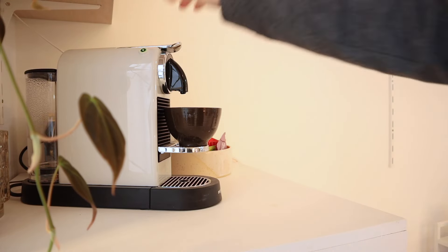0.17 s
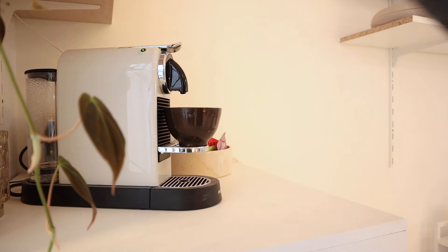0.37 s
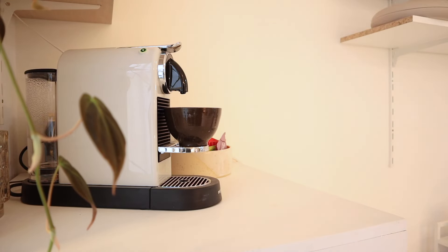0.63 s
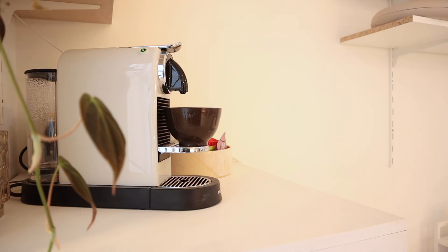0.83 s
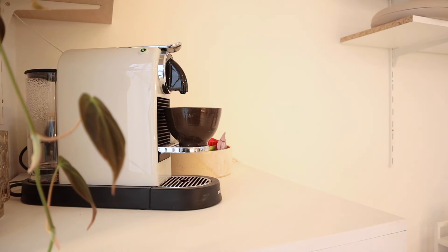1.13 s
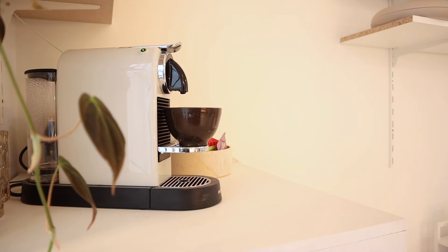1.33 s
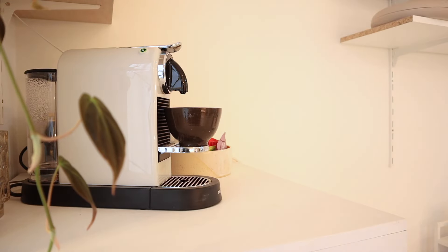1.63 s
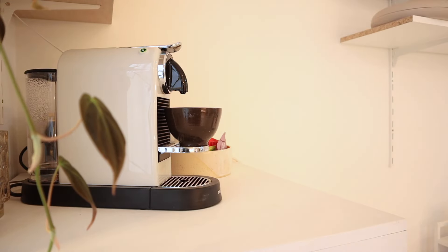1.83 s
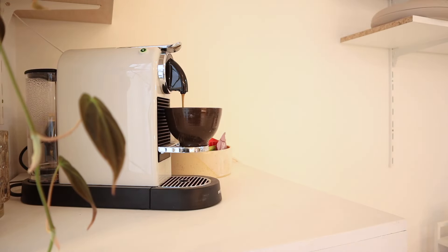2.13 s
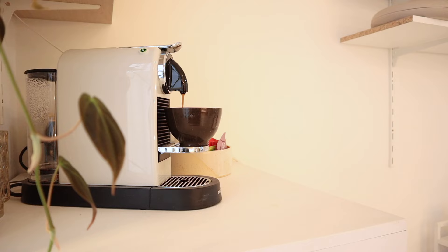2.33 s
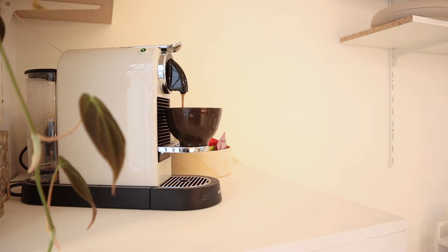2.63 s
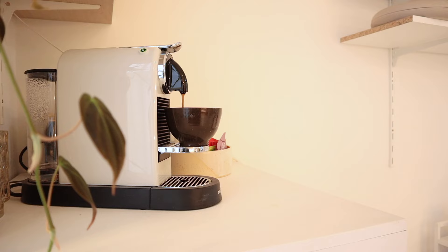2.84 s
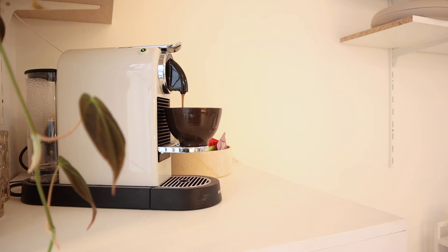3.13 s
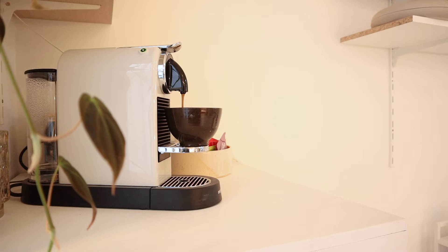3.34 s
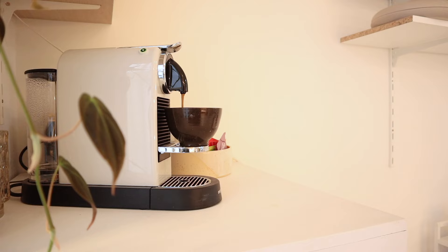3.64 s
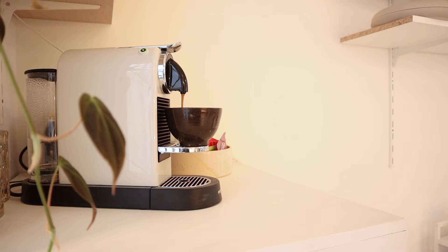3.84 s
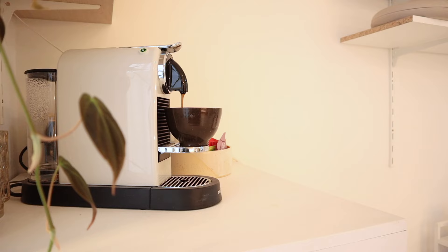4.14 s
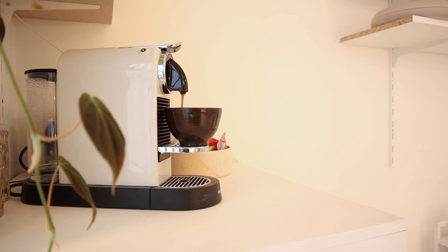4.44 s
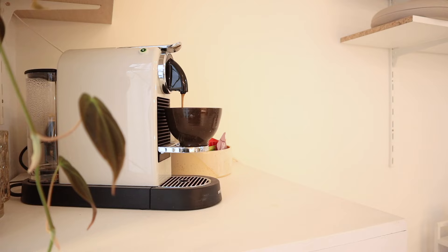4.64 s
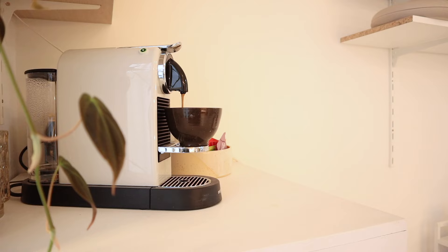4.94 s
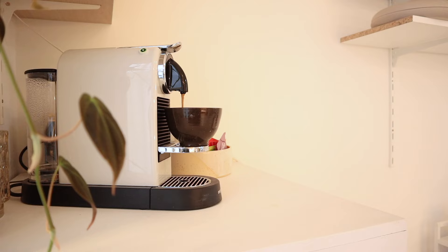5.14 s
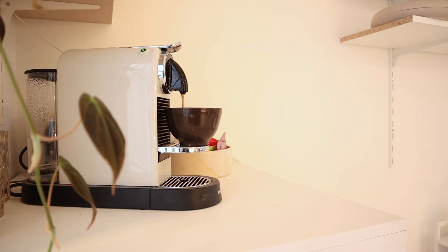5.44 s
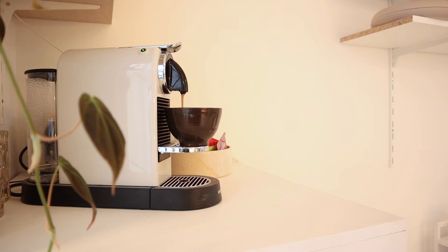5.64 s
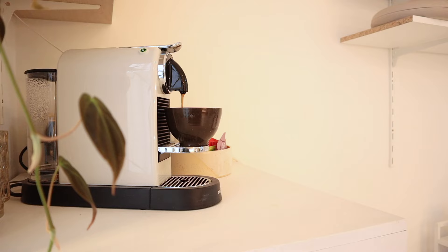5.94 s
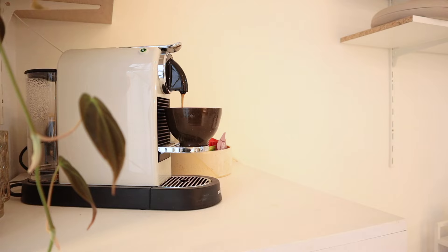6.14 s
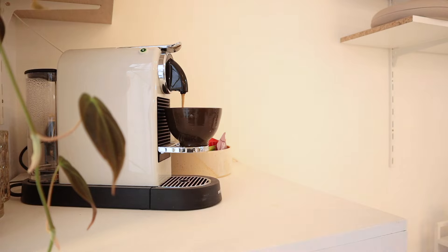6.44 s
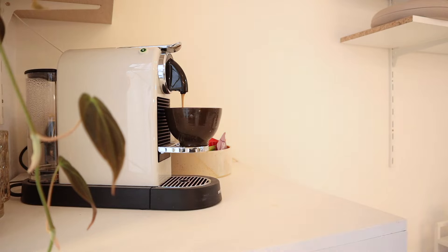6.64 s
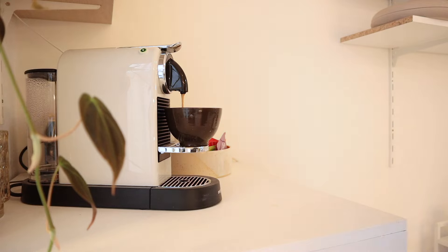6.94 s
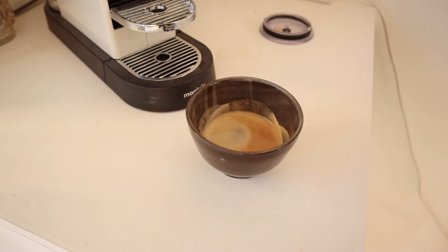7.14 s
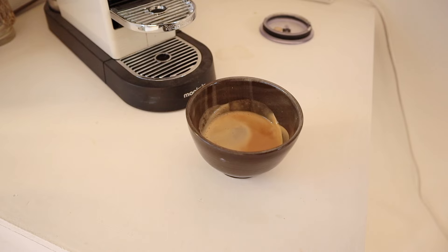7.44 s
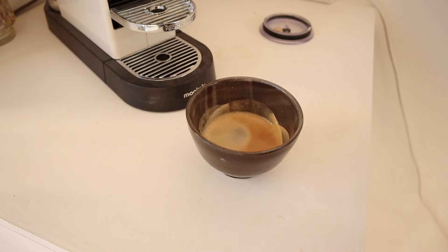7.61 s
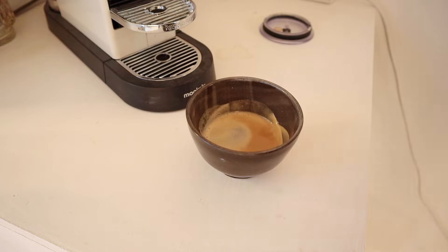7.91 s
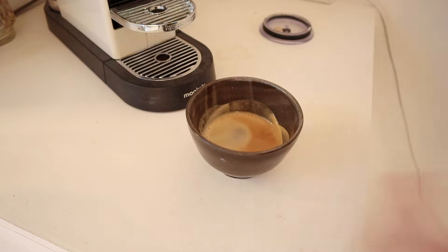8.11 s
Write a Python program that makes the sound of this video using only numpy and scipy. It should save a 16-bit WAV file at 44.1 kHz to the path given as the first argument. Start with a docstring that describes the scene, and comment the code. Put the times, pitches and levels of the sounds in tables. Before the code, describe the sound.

Small electric piston pump buzzing fifty times a second, heard close in stereo in a quiet room. The opening second is rough, airy and hissing; pressure then makes the drone deeper and firmer, with a few sharp plastic snaps. Coffee splutters and bubbles briefly, and a loose part begins buzzing along, tinny and uneven. After about seven seconds the machine cuts off at once and only soft room tone remains.

```python
"""Capsule coffee machine brewing

A piston pump hums and knocks 50 times a second: mains harmonics, and noise shaped by the casing.
It draws air first, loose and hissing: slams, valve spit and gliding rings of air pockets.
As pressure builds it runs tighter: clacks, capsule ticks, spluttering coffee, froth, a loose part's buzz.
The machine stops abruptly; the steady coloured noise of a quiet room, heard in stereo, remains.
"""
import sys
import numpy as np
from scipy import signal
from scipy.fft import rfft, irfft, next_fast_len
from scipy.io import wavfile

SR = 44100
rng = np.random.default_rng(int(sys.argv[2]) if len(sys.argv) > 2 else 0)


def log_audio(samples):
    """Write samples as a 16-bit WAV file to the path given in sys.argv[1]."""
    # one column per channel
    frames = np.atleast_2d(samples).T
    # limit to full scale, then quantise
    limited = np.clip(frames, -1, 1)
    pcm = np.round(limited * 32767).astype(np.int16)
    wavfile.write(sys.argv[1], SR, pcm)


N = 364707

MAINS_HZ, STOP_S, CUTOFF_HZ = 50.0, 7.053, 14300
TIME = np.arange(N) / SR
SIZE = next_fast_len(N, real=True)
FREQ = np.maximum(np.arange(SIZE // 2 + 1) * SR / SIZE, 1)


def from_db(db):
    """Decibels to gain."""
    return np.exp(np.asarray(db) * np.log(10) / 20)


def rms(x):
    """Root mean square."""
    return np.sqrt(np.mean(x ** 2) + 1e-20)


def in_time(rows):
    """Each column of a curve, sample by sample."""
    s, *columns = np.transpose(rows)
    return [np.interp(TIME, s, c) for c in columns]


def colour(points):
    """Gain at every frequency from (Hz, dB) points, straight lines over log frequency."""
    hz, db = np.transpose(points)
    return from_db(np.interp(np.log(FREQ), np.log(hz), db))


def above(hz, order):
    """Gain of a high-pass."""
    return 1 / np.sqrt(1 + (hz / FREQ) ** (2 * order))


def filtered(x, gain):
    """Apply a gain per frequency."""
    return irfft(rfft(x, SIZE) * gain, SIZE)[..., :N]


def noise(gain):
    """Two unrelated coloured noises (direct, scattered) of joint rms 1."""
    x = filtered(rng.standard_normal((2, N)), gain)
    return x / rms(x)


def drift(rate_hz):
    """Slow chance of spread 1: white noise through two equal poles, one value per 40 samples."""
    step = 40
    r = np.exp(-2 * np.pi * rate_hz * step / SR)
    chance = rng.standard_normal(N // step + 2002)
    slow = signal.lfilter([1], [1, -2 * r, r * r], chance)[2000:]
    return np.interp(np.arange(N) / step, np.arange(len(slow)), slow / rms(slow))


def envelope(start_s, attack_s, end_s, release_s, sag_db_per_s=0):
    """Attack, a hold that sags steadily in dB, release."""
    rise = np.clip((TIME - start_s) / attack_s, 0, 1)
    fall = np.clip(1 - (TIME - end_s) / release_s, 0, 1)
    return rise * fall * from_db(-sag_db_per_s * np.maximum(TIME - start_s, 0))


def looped(cycle, start_s):
    """Repeat one cycle for ever, beginning at a given moment."""
    return np.tile(np.roll(cycle, round(start_s * SR), axis=1), N // cycle.shape[1] + 1)[:, :N]


def each_stroke(start_s, decay_s, steady):
    """An envelope of rms 1 that rises once a cycle and dies down to a steady part."""
    age = (TIME[:round(SR / MAINS_HZ)] - start_s) % (1 / MAINS_HZ)
    pulse = steady + np.exp(-age / decay_s) * (1 - np.exp(-age / 0.0025))
    return np.resize(pulse / rms(pulse), N)


def taps(start_s, jitter_s, uneven_db):
    """One click per stroke, a little uneven in time and strength; two rows (direct, scattered)."""
    s = np.arange(start_s, STOP_S, 1 / MAINS_HZ)
    chance, out = rng.uniform(-1, 1, (len(s), 3)), np.zeros((2, N))
    for row in (0, 1):
        at = np.round((s + jitter_s * chance[:, row]) * SR).astype(int)
        out[row, at] = from_db(uneven_db * chance[:, 2])
    return out


def strong_weak(strong_s, contrast):
    """Gain that favours every other stroke; the sign of contrast picks which."""
    return 1 + contrast * np.cos(np.pi * MAINS_HZ * (TIME - strong_s))


def impacts(clicks, points, decay_s):
    """Clicks turned into short coloured cracks, rms 1."""
    age = TIME[:round(SR / MAINS_HZ)]
    crack = rng.standard_normal((2, len(age))) * np.exp(-age / decay_s)
    out = filtered(clicks, colour(points) * rfft(crack, SIZE))
    return out / rms(out)


def bursts(rows, points, attack_s, decay_s):
    """Short puffs of coloured noise, one for each (s, dB) row."""
    level = 0
    for s, db, *_ in rows:
        attack = np.clip((TIME - s) / attack_s, 0, 1)
        level = level + from_db(db) * attack * np.exp(-np.clip(TIME - s, 0, 1) / decay_s)
    return level * noise(colour(points))


def ring(clicks, hz, t60_s):
    """A unit click sets a decaying sine of starting height 1 ringing."""
    r, w = from_db(-60 / (t60_s * SR)), 2 * np.pi * hz / SR
    # the tiny offset keeps the filter state out of denormals
    return signal.lfilter([0, np.sin(w)], [1, -2 * r * np.cos(w), r * r], clicks + 1e-18)


# brew progress: t/s, stage (0 priming, 1 pressure builds, 2 first coffee, 3 steady flow)
PROGRESS = [(0, 0), (.92, 0.5), (1.17, 1), (2.3, 1), (2.9, 2), (4.0, 2), (4.6, 3), (7.05, 3)]


def stage_shares():
    """Share of each of the four stages at every moment; they sum to 1."""
    stage, = in_time(PROGRESS)
    return np.array([np.maximum(1 - abs(stage - k), 0) for k in range(4)])


# momentary swells and dips of the hum: t/s, half length/s, multiple of the stroke rate, level/dB
SWELLS = [(0.28, .13, 2, -5), (0.9, 0.061, 3, -12), (4.45, 1, 3, -3.5), (6.7, 0.76, 4, -4.5),
          (0.99, 0.2, 5, -15), (4.85, .33, 5, -5), (6.6, 0.52, 5, 5), (0.026, 0.081, 7, -23),
          (0.8, 0.15, 7, 6.5), (1.5, .19, 7, -6), (4.78, 0.41, 7, -14), (0.943, 0.07, 8, 10),
          (1.14, 0.081, 8, -9), (6.95, 0.16, 8, 6.5), (1.36, 0.13, 9, 13), (3.15, .39, 9, -6),
          (4.44, 0.62, 9, 4.5), (6, 0.55, 9, -14), (6.85, 0.32, 9, 6.5), (5.25, 0.61, 10, 3.5),
          (1.52, .25, 12, -22), (2.22, 0.18, 12, 5), (3.77, 0.25, 12, 4.5), (4.56, 0.5, 12, -12.5),
          (6.9, 0.15, 12, 4), (6.88, 0.21, 12, 4), (2.8, 0.68, 13, 10), (5.5, 0.76, 13, 5.5),
          (4, 0.3, 14, -13), (7.4, .18, 16, -5), (2.6, 0.76, 20, 10), (1.67, 0.25, 22, -8)]


def swell_db(multiple):
    """Bell-shaped swells and dips of one multiple of the hum."""
    out = 0
    for s, half_s, k, db in SWELLS:
        if k == multiple:
            out = out + db * np.exp(-np.minimum(((TIME - s) / half_s) ** 2, 20))
    return out


# hum spectrum in each stage: multiple of the stroke rate, relative level/dB
HUM_PRIMING = [(1, -4.5), (2, -1), (3, 6), (4, -30), (5, -8), (6, -10), (7, -1), (8, -9.5), (9, -7),
               (10, -35), (11, -16), (12, -13.5), (13, -20), (14, -14), (15, -18), (16, -10), (17, -10.5),
               (18, -29), (19, -20), (20, -16), (21, -32), (22, -29), (23, -21), (24, -16.5), (25, -11),
               (26, -40)]
HUM_BUILDING = [(1, -15), (2, 0), (3, -15), (4, -18.5), (5, -13.5), (6, -14.5), (7, -22), (8, -17.5),
                (9, -29), (10, -29.5), (11, -23.5), (12, -25), (13, -32), (14, -26.5), (15, -33), (16, -31),
                (17, -28.5), (18, -31.5), (19, -30), (20, -43), (21, -31.5), (22, -23.5), (23, -32.5),
                (24, -36), (25, -31), (26, -33)]
HUM_FIRST = [(1, -11.5), (2, 2.5), (3, -14), (4, -13), (5, -12), (6, -12.5), (7, -15), (8, -13), (9, -15.5),
             (10, -28.5), (11, -18.5), (12, -13.5), (13, -31), (14, -24.5), (15, -27.5), (16, -29),
             (17, -25.5), (18, -26.5), (19, -24), (20, -30.5), (21, -29.5), (22, -22.5), (23, -32),
             (24, -28), (25, -32), (26, -28)]
HUM_STEADY = [(1, -10.5), (2, 4), (3, -1.5), (4, -15.5), (5, -15), (6, -10), (7, -12), (8, -13), (9, -19),
              (10, -22), (11, -20.5), (12, -17.5), (13, -26), (14, -20.5), (15, -31), (16, -17.5),
              (17, -30.5), (18, -25), (19, -35.5), (20, -32), (21, -40), (22, -29.5), (23, -25.5),
              (24, -24.5), (25, -28), (26, -46)]
HUM_EASING_DB_PER_S = 0.5   # the hum sinks as the water finds its way through the coffee


def hum(shares, stage_db, waver_db=1.63, slip_rad=0.77, push_s=.018, dispersion=.07, flutter_rad=0.57):
    """The piston shakes the body at mains multiples; higher ones waver more, and flutter on air."""
    tables = (HUM_PRIMING, HUM_BUILDING, HUM_FIRST, HUM_STEADY)
    heights = from_db([np.array(t)[:, 1] + db for t, db in zip(tables, stage_db)])
    out = 0
    for k, height in enumerate(heights.T, 1):
        loose = min(k / 8, 1.4)
        level_db = swell_db(k) - HUM_EASING_DB_PER_S * TIME + waver_db * loose * drift(2.34)
        gain = (height @ shares) * from_db(level_db)
        # the lowest three move in step with the push; panel bending waves spread the rest over the cycle
        over = max(k - 3, 0)
        scatter = dispersion * over ** 2 + rng.random((2, 1)) * [[.25], [1]] * (over > 0)
        phase = 2 * np.pi * (k * MAINS_HZ * (TIME - push_s) + scatter) + slip_rad * loose * drift(1.42)
        flutter = flutter_rad * shares[0] * (k / len(HUM_STEADY) * 2) ** 2 * drift(6.5)
        out = out + gain * np.cos(phase + flutter)
    return np.sqrt(2) * out


def knocks(start_s, sign, build_s=0.0037, ring_s=0.010, kitchen_db=-16, kitchen_s=0.11, wander_rad=0.29):
    """Strokes spread by dense casing modes and the kitchen; negative sign flips every other stroke."""
    period = round(SR / MAINS_HZ)
    age = TIME[:8 * period]
    tail = np.exp(-age / ring_s) + from_db(kitchen_db) * np.exp(-age / kitchen_s)
    stroke = (1 - np.exp(-age / build_s)) * tail * rng.standard_normal((4, len(age)))
    # the tails of earlier strokes overlap within a pair of strokes
    pair = stroke.reshape(4, -1, 2 * period).sum(axis=1)
    pair = pair + sign * np.roll(pair, period, axis=1)
    # the contact shifts slowly between two patterns, so single overtones swell and fade
    patterns, turn = looped(pair / rms(pair), start_s), wander_rad * drift(1.35)
    return np.cos(turn) * patterns[:2] + np.sin(turn) * patterns[2:]


# casing colour in each stage: f/Hz, relative density/(dB per Hz)
CASE_PRIMING = [(120, -52), (200, -12), (244, -20), (320, -13), (348, -4.5), (483, -15.5), (741, -27.5),
                (830, -18), (999, -29), (1220, -20), (2480, -30), (3800, -30.5), (6000, -37.5), (7800, -65),
                (13200, -120)]
CASE_BUILDING = [(120, -35), (200, -7.5), (302, 0), (369, -7.5), (402, -0.5), (483, -10), (557, -7.5),
                 (741, -14), (1120, -17), (1640, -23), (1880, -20), (2120, -23), (6000, -29), (7800, -63),
                 (13200, -120)]
CASE_FIRST = [(120, -45), (200, -23), (221, -25), (244, 2), (402, -1), (497, -7.5), (607, -4), (652, -14.5),
              (1120, -16.5), (1670, -22), (2010, -20), (6000, -25.5), (7800, -24), (13200, -120)]
CASE_STEADY = [(120, -28), (200, -4), (302, 1.5), (374, -6), (402, 1.5), (741, -16.5), (891, -14),
               (1220, -17), (1670, -22), (2990, -23), (3800, -25), (4500, -26.5), (6000, -32), (7800, -55),
               (13200, -120)]
# running per stage: f/Hz above which strokes differ by chance, alternating share of regular power,
# knock t/s in the cycle, valve opening t/s in the cycle, steady part of the valve flow
RUNNING = [(1340, 0.012, .0140, .0112, 0.5), (2470, 0.1, .0178, 0.019, 1),
           (4700, 0.36, .0178, 0.0063, 0.88), (4850, 0.35, .0175, 0.0046, 0.2)]
# panel resonances (dips where negative): f/Hz, width/Hz, lift/dB
PANELS = [(804, 150, 4.5), (1184, 40, 3), (1480, 100, 1.5), (1625, 90, -0.5), (2550, 200, -2.5),
          (2960, 160, 3), (3480, 370, -7), (3580, 120, 6.5), (4090, 98, 4.5), (4240, 240, -8.5),
          (4740, 110, 1.5), (4930, 170, -7)]


def casing(shares, level_db, chance_db=-0.16, regular_db=-3.1, alternate_db=-2.5, steepness=1.41):
    """Piston knocks nearly repeat low down, alternate strong and weak, and scatter into rattle higher up."""
    panels = from_db(sum(db / (1 + (2 * (FREQ - hz) / width) ** 2) for hz, width, db in PANELS))
    panels = panels / np.sqrt(1 + (FREQ / 5000) ** 12)   # plastic damps the top
    over_hum = above((len(HUM_STEADY) + .5) * MAINS_HZ, order=24)
    rattle_band = (FREQ > 850) & (FREQ < 4500)
    tables, out = (CASE_PRIMING, CASE_BUILDING, CASE_FIRST, CASE_STEADY), 0
    for share, points, (loose_hz, alternating, knock_s, _, _) in zip(shares, tables, RUNNING):
        body = colour(points) * panels
        body = body / rms(body * rattle_band)
        regular = np.exp(-(FREQ / loose_hz) ** steepness)
        rattle = rng.standard_normal((2, N)) * each_stroke(knock_s, decay_s=0.0021, steady=0.35)
        chance_gain = from_db(chance_db) * np.sqrt(1 - regular)
        regular_gain = from_db(regular_db) * np.sqrt(regular * (1 - alternating)) * over_hum
        alternate_gain = from_db(alternate_db) * np.sqrt(regular * alternating) * above(254, order=1)
        drive = chance_gain * rfft(rattle, SIZE)
        drive += regular_gain * rfft(knocks(knock_s, 1.0), SIZE)
        drive += alternate_gain * rfft(knocks(knock_s, -0.78), SIZE)
        out = out + np.sqrt(share) * irfft(drive * body, SIZE)[:, :N]
    return from_db(level_db) * out


# rubber mounts: f/Hz, relative density/(dB per Hz)
MOUNT = [(60, -12), (120, -3.5), (150, -3), (168, 6.5), (185, -1.5), (225, -32), (400, -72)]


def mount_wobble(level_db):
    """The pump wobbles on its rubber mounts: low coloured noise."""
    return from_db(level_db) * noise(colour(MOUNT))


# piston slamming on air: f/Hz, relative density/(dB per Hz)
GROWL_COLOUR = [(500, -18), (850, 0), (1300, 2), (2100, -18), (2700, -7), (4000, -15), (7000, -54)]
# hardest slams: t/s, level/dB
SLAMS = [(.074, -31), (.095, -32), (.133, -27), (.162, -25), (.190, -29), (.311, -32), (.331, -27),
         (.394, -24)]


def growl(slam_s=0.014, level_db=-40.5, contrast=0.23):
    """Pumping air at first, the piston slams unevenly, with single hard blows."""
    level = from_db(level_db) * envelope(start_s=-0.039, attack_s=0.2, end_s=0.34, release_s=0.4)
    strokes = taps(slam_s, jitter_s=.001, uneven_db=3) * strong_weak(slam_s, contrast)
    clatter = level * impacts(strokes, GROWL_COLOUR, decay_s=0.003)
    return clatter + bursts(SLAMS, GROWL_COLOUR, attack_s=.0012, decay_s=.006)


def chatter(points, alike):
    """Coloured noise of rms 1, a share of whose power is the same in every cycle."""
    cycle = rng.standard_normal((2, round(SR / MAINS_HZ)))
    regular = filtered(looped(cycle, 0), colour(points))
    return np.sqrt(alike) * regular / rms(regular) + np.sqrt(1 - alike) * noise(colour(points))


# valve hiss, and its spit while air is in the line: f/Hz, relative density/(dB per Hz)
VALVE = [(3500, -2), (4900, -5), (5200, 3), (5700, 3), (6400, 4.5), (7100, -2), (7750, 4.5), (8800, -2),
         (10000, 3.5), (11000, 7.5), (11600, -9), (12400, -26), (14500, -30)]
SPIT_COLOUR = [(3000, -8), (5000, -2.5), (7100, 4), (7750, 7), (8300, 5), (8900, -1.5), (10000, 5.5),
               (11000, -0.5), (11600, -1.5), (12400, -44), (14500, -51)]
SPIT_DB, SPIT_SAG_DB_PER_S = -39, 5


def valve(shares, level_db, uneven_db=1.5, repeating=0.35, spit_s=0.0116):
    """Each stroke forces a hissing squirt through the valve: spit on air, part-regular chatter on coffee."""
    spit = from_db(SPIT_DB) * envelope(-0.21, attack_s=0.47, end_s=1.06, release_s=0.066,
                                       sag_db_per_s=SPIT_SAG_DB_PER_S)
    spit = spit * each_stroke(spit_s, decay_s=0.0037, steady=0.42) * noise(colour(SPIT_COLOUR))
    gate = 0
    for share, (*_, open_s, steady) in zip(shares, RUNNING):
        gate = gate + share * each_stroke(open_s, decay_s=0.0023, steady=steady)
    hiss = from_db(level_db) * gate * chatter(VALVE, repeating * (shares[2] + shares[3]))
    return (hiss + spit) * from_db(uneven_db * drift(66))


# trapped air (long rasp, whirr, thin whistle, quick gulp, gurgle of froth in the spout):
# start t/s, attack/s, end t/s, release/s, level/dB, sag/(dB/s),
# first f/Hz, last f/Hz, mid-glide t/s, glide/s, width/Hz
AIR_POCKETS = [(-.1, 0.19, 1.33, .45, -52, 5.5, 1066, 2200, 0.5, 0.45, 270),
               (.72, 0.086, 1.05, .05, -44, -5, 1852, 2196, 0.87, 0.066, 380),
               (.88, 0.11, 1.12, .06, -53, 0, 5950, 6100, .95, 0.064, 520),
               (.95, 0.083, 1.35, 0.11, -31.5, 37, 290, 807, 1.172, 0.0493, 520),
               (1.8, 0.5, 2.6, 0.18, -45.5, 4, 1150, 1600, 2.3, 0.23, 910)]


def air_pockets():
    """Turbulence, pulsed by the strokes, rings trapped air, rising in pitch as the pockets shrink."""
    out = 0
    for *times, db, sag_db_per_s, first_hz, last_hz, middle_s, glide_s, width_hz in AIR_POCKETS:
        hz = first_hz + (last_hz - first_hz) * (1 + np.tanh((TIME - middle_s) / glide_s)) / 2
        turbulence = noise(1 / (1 + (2 * FREQ / width_hz) ** 4))
        carrier = np.exp(2j * np.pi * np.cumsum(hz) / SR)
        tone = (turbulence[0] + 1j * turbulence[1]) * carrier
        out = out + from_db(db) * envelope(*times, sag_db_per_s) * np.array([tone.real, tone.imag])
    return each_stroke(0.015, decay_s=0.007, steady=0.63) * out


# room tone: f/Hz, relative density/(dB per Hz)
ROOM = [(12, -44), (20, -19), (32, -5.5), (54, -1.5), (70, -2.5), (105, -1), (125, -11), (175, -13),
        (261, -12.5), (509, -19), (2000, -27), (6000, -34.5), (8000, -41), (10000, -30), (12000, -40),
        (15000, -73)]
ROOM_DB = -53.5


def room_tone():
    """The room's faint rumble and hiss: steady coloured noise."""
    return from_db(ROOM_DB) * noise(colour(ROOM))


# piston meeting its stop: f/Hz, relative density/(dB per Hz)
CLACK_COLOUR = [(900, -25), (1900, 1), (3000, -5.5), (3900, 1.5), (4700, -1), (6000, -12), (8000, -18),
                (12000, -50)]


def clack(shares, stop_s=.0194, building_db=-53.5, first_db=-53, steady_db=-60.5):
    """Under pressure the piston meets its stop with a short clack on every stroke."""
    level = from_db([building_db, first_db, steady_db]) @ shares[1:]
    strokes = taps(stop_s, jitter_s=.00002, uneven_db=2.0)
    return level * impacts(strokes, CLACK_COLOUR, decay_s=0.0035)


# panel overtones: start t/s, attack/s, end t/s, release/s, multiple of the stroke rate, level/dB
OVERTONES = [(1.198, 0.4, 3.7, .6, 29, -58), (1.202, .3, 3.6, .6, 30, -57.5), (1.598, .5, 3.8, .6, 41, -57),
             (1.5, 0.57, 3.88, .5, 80, -68), (1.8, .7, 3.8, .6, 92, -72), (4.302, .3, 5.2, 0.98, 72, -59.5),
             (4.998, 1, 8.4, .1, 37, -60.5)]


def overtones(waver_db=3.0, slip_rad=0.42):
    """Thin tones: single multiples of the stroke rate meet a panel resonance as the load changes."""
    out = 0
    for *times, k, db in OVERTONES:
        phase = 2 * np.pi * (k * MAINS_HZ * TIME + rng.random((2, 1))) + slip_rad * drift(1.9)
        out = out + from_db(db + waver_db * drift(3.3)) * envelope(*times) * np.cos(phase)
    return np.sqrt(2) * out


# capsule ticks under pressure: t/s, snap level/dB, ring f/Hz, ring level/dB
TICKS = [(1.278, -58, 8800, -42), (1.3995, -36, 2130, -31), (1.5155, -40, 2200, -44),
         (1.836, -37, 2150, -35), (2.0764, -33.5, 3400, -44)]
# snap colour: f/Hz, relative density/(dB per Hz)
TICK_COLOUR = [(900, -8), (2100, 7), (3200, 9), (5000, 6), (7500, 3), (10500, 3), (12500, -43)]


def ticks(ring_t60_s=0.066):
    """Short dry snaps of the capsule as it swells, each with a brief ring of its own."""
    rings = 0
    for s, _, hz, db in TICKS:
        click = np.arange(N) == round(s * SR)
        rings = rings + from_db(db) * ring(click, hz, ring_t60_s)
    return bursts(TICKS, TICK_COLOUR, attack_s=.0011, decay_s=0.0077) + rings


# splutters: t/s, level/dB
SPLUTTERS = [(2.181, -38), (2.221, -36), (2.241, -36.5), (2.460, -38), (2.581, -40)]
# splutter colour: f/Hz, relative density/(dB per Hz)
SPLUTTER_COLOUR = [(700, -16), (1300, 3), (1900, -1), (2400, 0), (3200, -12), (5000, -10), (9000, -44)]


def splutters():
    """The first coffee splutters out of the spout in short noise puffs."""
    return bursts(SPLUTTERS, SPLUTTER_COLOUR, attack_s=.0012, decay_s=0.0077)


# froth: start t/s, attack/s, end t/s, release/s, level/dB
FROTH_BOUTS = [(2.13, 0.036, 1.9, 0.071, -47), (2.35, 0.096, 2.6, .06, -42.5)]
BUBBLES_PER_S, BUBBLE_LOW_HZ, BUBBLE_HIGH_HZ, BUBBLE_CYCLES = 760, 735, 2510, 24


def froth(spread_db=3, tilt_db_per_octave=-3.0):
    """Small bubbles burst at random as the first coffee pushes through the spout."""
    count = int(BUBBLES_PER_S * N / SR)
    when, size, pitch, sway = rng.random((count, 4)).T
    pitches, out = np.geomspace(BUBBLE_LOW_HZ, BUBBLE_HIGH_HZ, num=12), 0
    size_gain = from_db(spread_db * np.minimum(-np.log(1 - size), 3))
    strength = size_gain * np.array([np.cos(2 * np.pi * sway), np.sin(2 * np.pi * sway)])
    for k, hz in enumerate(pitches):
        mine, clicks = (pitch * len(pitches)).astype(int) == k, np.zeros((2, N))
        clicks[:, (when[mine] * N).astype(int)] = strength[:, mine]
        tilt = from_db(tilt_db_per_octave * np.log2(hz / BUBBLE_LOW_HZ))
        out = out + tilt * ring(clicks, hz, BUBBLE_CYCLES / hz)
    level = sum(from_db(db) * envelope(*times) for *times, db in FROTH_BOUTS)
    return level * out / rms(out)


# buzzing bouts: start t/s, attack/s, end t/s, release/s, tap level/dB, strong-weak contrast (-1 to 1)
LOOSE_BOUTS = [(2.4, 0.45, 4.4, .7, -52, 0.63), (4.7, .6, 5.4, 0.065, -50.5, -0.13),
               (5.56, .06, 5, 0.091, -56, .2), (5.97, .06, 6.82, 0.039, -48, -0.22),
               (6.82, 0.068, 7.3, .1, -47, -0.48)]
# hardest taps: t/s, level/dB
HARD_TAPS = [(5.617, -42), (5.677, -43), (5.757, -43), (5.797, -46), (5.837, -46), (5.877, -44),
             (5.917, -43.5), (5.957, -43.5), (6.097, -45), (6.137, -44), (6.377, -45), (6.977, -44)]
# modes of the loose part: f/Hz, level/dB, t60/s
LOOSE_MODES = [(1170, -3, 0.031), (1208, 4.5, 0.063), (1830, -10, 0.046), (2920, 1.5, 0.052),
               (3076, 1, .045), (3720, -16, 0.047)]


def loose_part(touch_s=0.0373, jitter_s=.00004, uneven_db=3.5, soft_hz=7000):
    """Strokes tap a loose part, strong and weak in turn, at times hard; it rings in metallic modes."""
    force = 0
    for *times, db, contrast in LOOSE_BOUTS:
        force = force + from_db(db) * envelope(*times) * strong_weak(touch_s, contrast)
    force = force * from_db(uneven_db * drift(22))
    for s, db in HARD_TAPS:
        force = np.where(abs(TIME - s) < .5 / MAINS_HZ, from_db(db), force)
    clicks = force * taps(touch_s, jitter_s, uneven_db=0.0)
    clicks = filtered(clicks, 1 / (1 + (FREQ / soft_hz) ** 4))
    return sum(from_db(db) * ring(clicks, hz, t60_s) for hz, db, t60_s in LOOSE_MODES)


# stereo width: f/Hz, side minus mid level/dB
MACHINE_WIDTH = [(60, -83), (130, -65), (200, -39), (350, -12.5), (700, -12), (1400, -3.5), (2800, 1.5),
                 (5600, 4), (10000, 6), (11400, 9.5), (12600, 27)]
ROOM_WIDTH = [(60, -75), (140, -1), (350, 0.5), (830, 4.5), (2000, 4), (4800, 8), (11500, 7.5)]


def microphone(pair, width, direct, lead_rad):
    """Side signal: part direct sound, phase-shifted so that left leads, part scattered sound."""
    direct_side = filtered(pair[0], colour(width) * direct * np.exp(1j * lead_rad))
    scattered_side = filtered(pair[1], colour(width) * np.sqrt(1 - direct ** 2))
    side = direct_side + scattered_side
    return np.array([pair[0] + side, pair[0] - side])


# base levels per stage: hum/dB, casing rattle/dB, valve hiss/dB, mount wobble/dB
STAGE_LEVELS = [(-29.5, -36, -47.5, -39.5), (-22, -39.5, -55.5, -39), (-25.5, -42.5, -54.5, -44),
                (-27, -42.5, -54.5, -47.5)]
# until the air is out of the line, the undamped piston rattles harder
AIR_OUT_S, AIR_RATTLE_DB, RATTLE_SETTLES_S = 0.84, 4.5, 0.38


def scene():
    """Pump and water, a little to the left, over the room's faint rumble and hiss."""
    shares = stage_shares()
    hum_db, rattle_db, valve_db, wobble_db = np.transpose(STAGE_LEVELS)
    air_left = np.clip(1 - (TIME - AIR_OUT_S) / RATTLE_SETTLES_S, 0, 1)
    pump = hum(shares, hum_db) + casing(shares, rattle_db @ shares + AIR_RATTLE_DB * air_left)
    pump = pump + mount_wobble(wobble_db @ shares) + growl() + clack(shares) + overtones() + loose_part()
    water = valve(shares, valve_db @ shares) + air_pockets() + ticks() + splutters() + froth()
    running = np.clip((STOP_S - TIME) / 0.0094 + .5, 0, 1)
    lead_rad = np.pi / 2 * FREQ / (FREQ + 1700)   # the left capsule of the microphone is nearer
    machine = running * microphone(pump + water, MACHINE_WIDTH, direct=0.61, lead_rad=lead_rad)
    return machine + microphone(room_tone(), ROOM_WIDTH, direct=.1, lead_rad=2.5)


def record(dry):
    """The top is cut steeply by an elliptic low-pass."""
    low_pass = signal.ellip(10, .1, 80, CUTOFF_HZ, fs=SR, output="sos")
    return signal.sosfilt(low_pass, dry)


dry = scene()
out = record(dry)
log_audio(out)
```